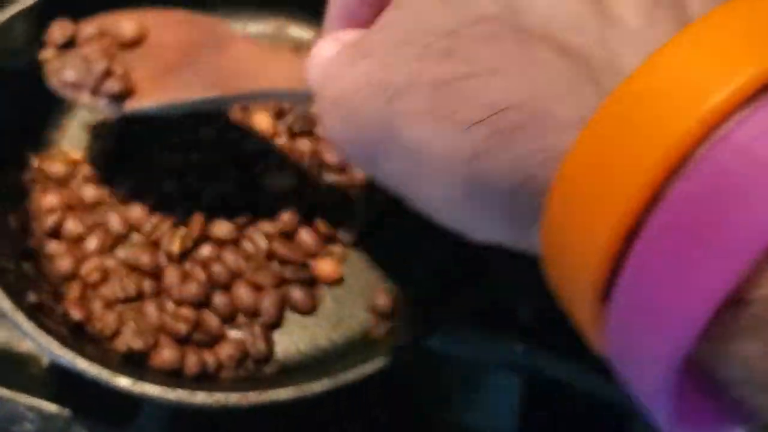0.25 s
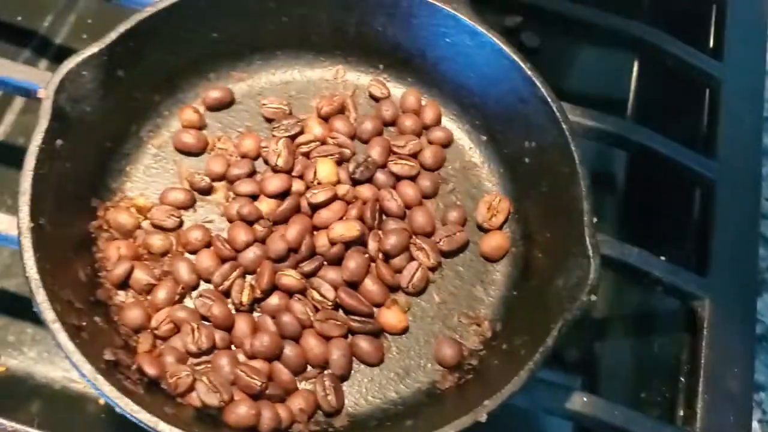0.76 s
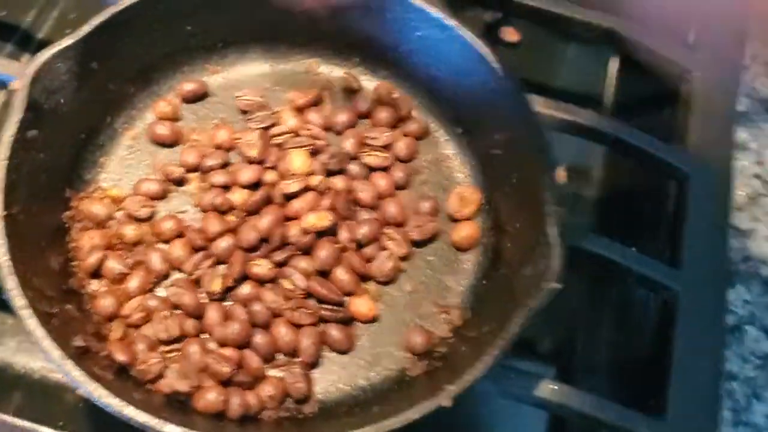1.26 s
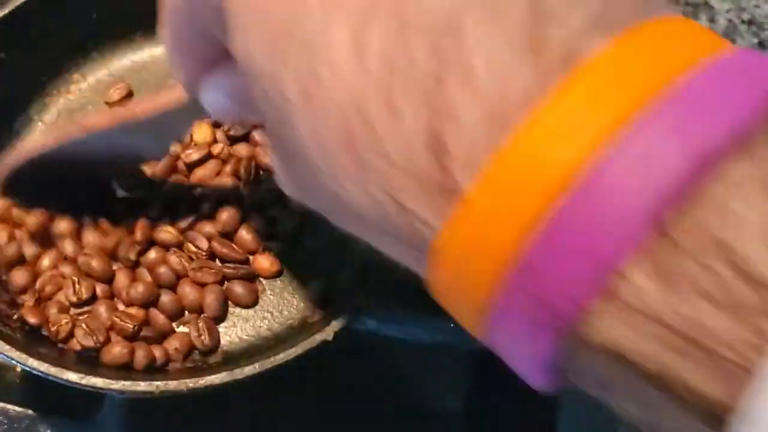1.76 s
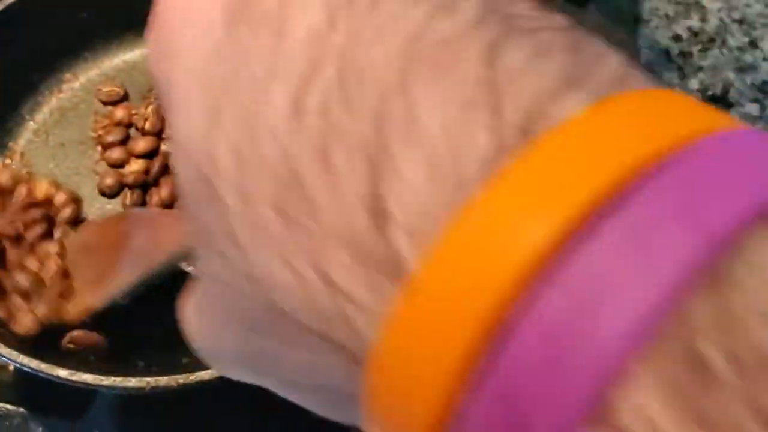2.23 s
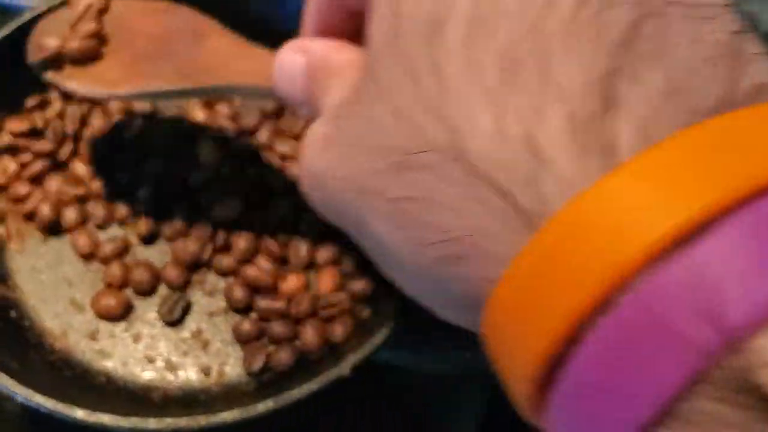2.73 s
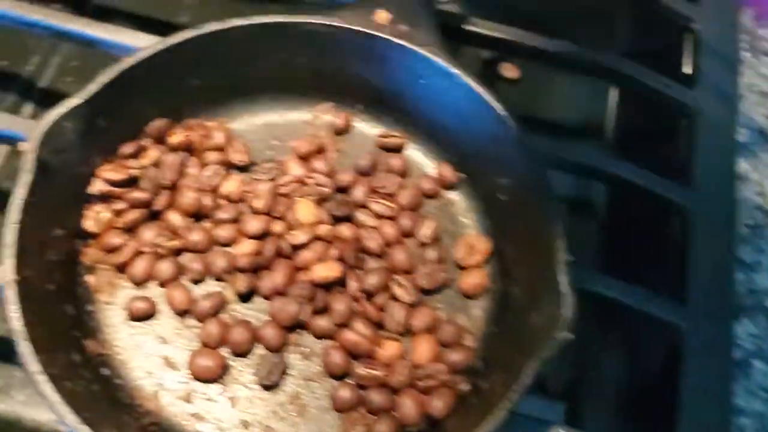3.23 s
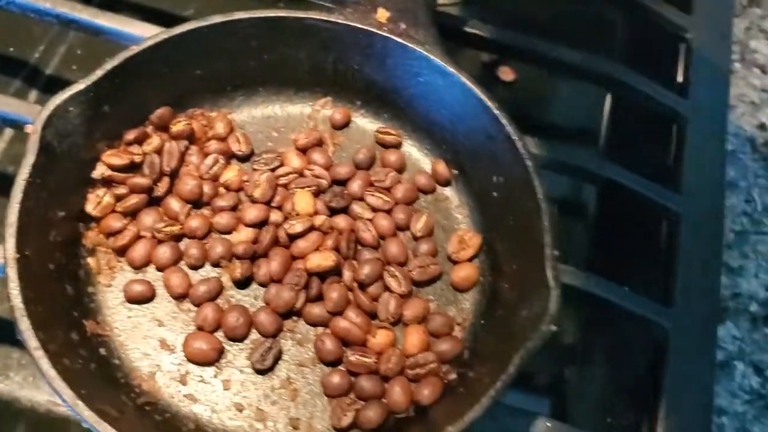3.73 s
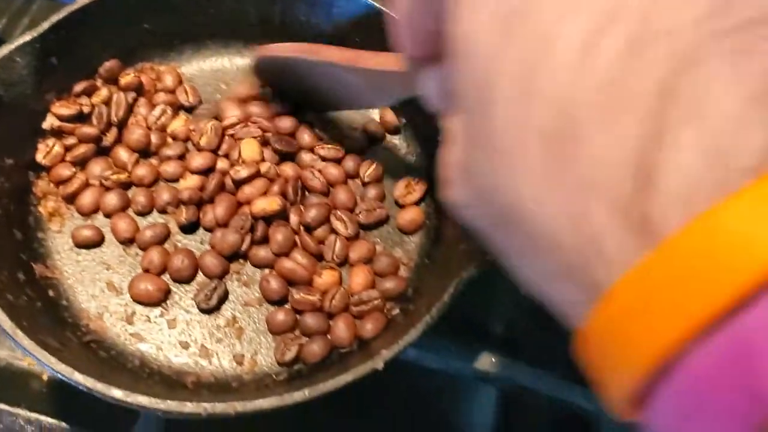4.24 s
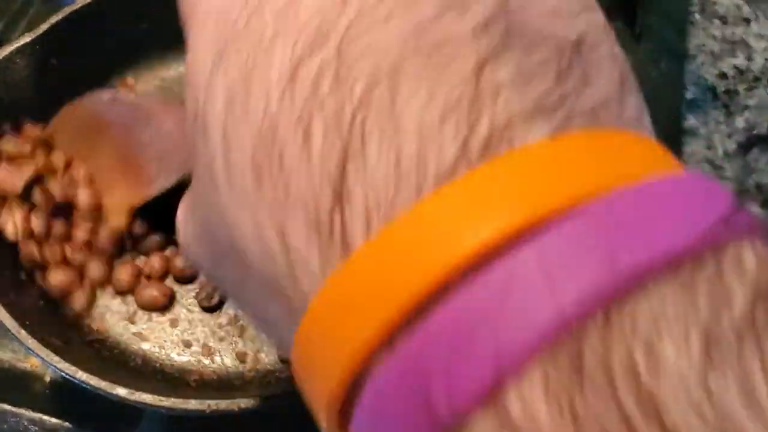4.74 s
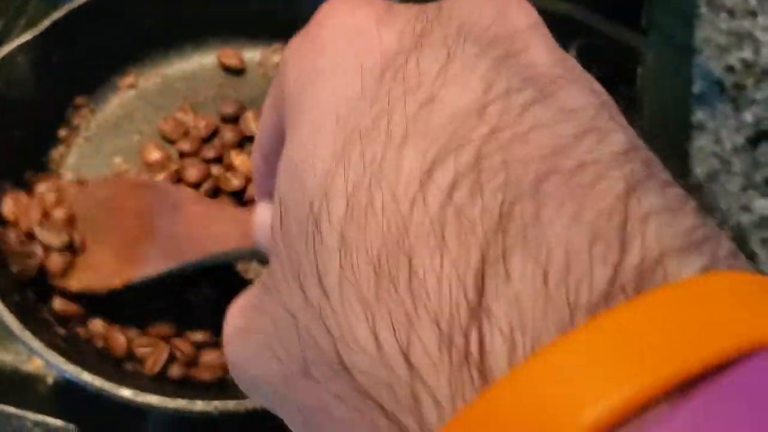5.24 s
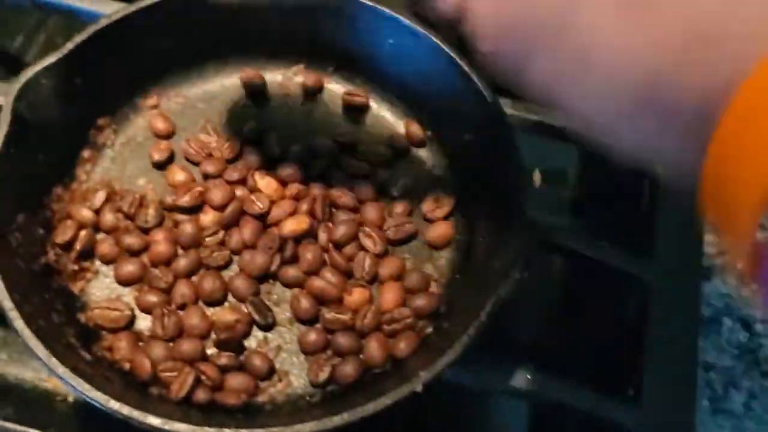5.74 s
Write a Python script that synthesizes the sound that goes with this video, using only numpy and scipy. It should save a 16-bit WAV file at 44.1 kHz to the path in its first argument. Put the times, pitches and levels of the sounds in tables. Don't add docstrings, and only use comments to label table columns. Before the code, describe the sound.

Close kitchen sound of hard beans being pushed and tipped in a ringing iron pan by a wooden blade, loose stove metal chattering twice.

```python
import sys
import numpy as np
from scipy import signal
from scipy.io import wavfile
from scipy.ndimage import uniform_filter1d

SR = 44100
rng = np.random.default_rng(int(sys.argv[2]) if len(sys.argv) > 2 else 0)


def materialize(psi):
    bounded = np.clip(np.atleast_2d(psi).T, -1, 1)
    quanta = np.round(bounded * 32767).astype(np.int16)
    wavfile.write(sys.argv[1], SR, quanta)


def voltage_ratio(decibels):
    exponent = np.asarray(decibels, float) / 20
    return 10 ** exponent


N = 263718

# frequency in Hz, density in dB per Hz.
RUMBLE_SPECTRUM = [(12, -53), (20, -41.5), (53, -2), (92, -9), (125, -3), (146, -23.5), (240, -9.5),
                   (333, -11), (389, -6.5), (629, -12), (707, -18), (793, -16.5), (2000, -49),
                   (2600, -78.5), (4400, -120)]
# frequency in Hz, left-right likeness from 0 to 1.
RUMBLE_LIKENESS = [(60, 0.79), (240, .93), (950, 0), (3770, 0)]
HUM_LEVELS = [-66, -66, -76, -68]
# frequency in Hz, density in dB per Hz.
HISS_SPECTRUM = [(710, -24.5), (1200, -21), (1990, -7), (2370, -5.5), (7250, -7.5), (8300, -2.5),
                 (15100, -1.5), (16000, 4), (16500, -30.5)]
# start in seconds, end in seconds.
PAUSES = [
    (0.468, .97),
    (3.13, 3.497),
    (5.7, 5.83),
]
# frequency in Hz, t60 in seconds.
ROOM_DECAY = [(300, 0.28), (2000, 0.16), (8000, 0.22), (16000, 0.16)]

# start in seconds, ring in dB, clatter in dB, ring fall in dB/s, clatter fall in dB/s.
SHAKES = [
    (.985, -27, -25, 79.5, 270),
    (1.072, -31, -19.5, 189.5, 332),
    (1.362, -81, -86, 14.5, 11),
    (3.498, -37.5, -37.5, 2, 64),
    (3.626, -40, -49.5, 129, 199.5),
    (4.031, -70.5, -90.5, 258.5, 20.5),
]
# time in seconds, ring in dB, clatter in dB, t60 in seconds.
JOLTS = [(0.9845, -22, -13.5, 0.076), (0.993, -19, -9.5, 0.052), (1.008, -24.5, -15.5, 0.098),
         (1.0225, -26.5, -15, 0.055), (1.0676, -36, -13, 0.048), (1.0738, -41, -17, 0.06),
         (1.088, -52, -14.5, .08), (1.108, -38, -22.5, 0.077), (1.3596, -48.5, -68, 0.013),
         (1.3693, -50.5, -77, 0.21), (3.4992, -27.5, -16, 0.038), (3.5362, -23, -15.5, 0.12),
         (3.5532, -21.5, -8.5, 0.033), (3.628, -26, -28, 0.022), (3.638, -29, -28, 0.041),
         (3.6753, -39, -34, 0.043), (1.7025, -61, -16, .07), (1.7062, -60, -12, 0.064)]
# frequency in Hz, density in dB per Hz.
CLATTER_SPECTRUM = [(710, -70.5), (1200, -61), (1880, -26.5), (2850, -24.5), (3800, -6.5), (4780, -14.5),
                    (10100, -1), (11200, 0), (15300, -1), (16500, -26)]
PART_HZ = [1790, 1919, 3600, 3720, 3814, 3876, 3920, 5000, 5888, 6044, 6593, 7516, 8463, 9572, 10808, 11309,
           11641, 12680, 13894, 14741, 15418]
PART_DB = [-23.5, -4, -19, -13.5, 6.5, -1, -6, -12.5, -4.5, -2, -3.5, -3.5, 4, -15.5, -26.5, -11.5, -12.5,
           -16.5, -20.5, -7, -10.5]

# time in seconds, pitch in Hz, level in dB, t60 in seconds.
PINGS = [(0.094, 110, -37.5, 0.046), (.195, 7210, -41, 0.33), (.213, 8172, -43, 0.22),
         (.444, 7100, -58, 0.18), (.444, 3100, -58.5, 0.33), (.993, 3531, -38, .15), (.99, 8904, -37, .15),
         (1.022, 3815, -29.5, 0.11), (1.075, 11154, -32.5, 0.17), (1.088, 11639, -33, 0.17),
         (1.095, 6040, -41.5, 0.28), (1.5052, 12000, -35, 0.0071), (1.6925, 2900, -37, .02),
         (2.005, 6998, -39, .25), (2.136, 14000, -30, 0.016), (2.31, 9790, -38, 0.17),
         (2.604, 6406, -50, .3), (2.686, 5340, -44.5, 0.57), (2.795, 6406, -42, 0.57),
         (2.794, 6966, -48, 0.34), (2.795, 7795, -49, .3), (3.499, 6700, -40.5, .08),
         (3.536, 1927, -35, 0.18), (3.537, 6643, -28, .12), (3.54, 6761, -36.5, .12),
         (3.537, 7526, -39, .12), (3.553, 11886, -35.5, .1), (3.553, 4996, -43, 0.24),
         (3.6, 1927, -48, 0.44), (4.181, 1712, -36.5, 0.091), (4.409, 2713, -38, .04),
         (4.455, 4748, -53, .4), (4.7, 7267, -32, .3), (4.7, 7074, -41, 0.26), (4.7, 4770, -44, 0.4),
         (5.43, 5814, -56, .3), (5.46, 9076, -49, .2)]

IRON_HZ = [385, 472, 1533, 1655, 1710, 2512, 3165, 3101, 3903, 4729, 4765, 5160, 5340, 5813, 6365, 6405,
           6967, 7210, 7792, 8175, 8993, 9352, 9800, 10691, 11005, 11341, 11734, 12503, 12995, 13321]
# level in dB, t60 in seconds.
IRON_MODES = [(-18, 0.24), (-15.5, 0.099), (-11.5, 0.33), (-11.5, 0.18), (-11, 0.091), (-29.5, 0.5),
              (-6.5, 0.16), (-10.5, 0.29), (-10, 0.08), (-6.5, 0.084), (-13, 0.25), (-14.5, 0.17),
              (-12, 0.098), (-13, 0.23), (-19, 0.14), (-11, 0.13), (-8, 0.17), (-3.5, 0.073), (-14, 0.16),
              (-15.5, 0.34), (-10, 0.13), (-20.5, 0.15), (-11.5, 0.2), (-20, 0.082), (-22.5, 0.05),
              (-9, 0.063), (-19.5, 0.18), (-18, 0.12), (-20.5, 0.11), (-17, 0.18)]
FLOOR_HZ = 3010, 3175
# start in seconds, whole pan in dB, direct fizz in dB, floor pair in dB.
LOOSENESS = [
    (0, -1, -6, -6.5),
    (1.4, 1.5, 1, -2),
    (1.69, -9.5, -2.7, 6),
    (2.3, -1, 2.5, 4),
    (4.1, -0.7, -4.5, 1),
    (4.54, 0.7, -1.5, -11),
    (4.69, 1, -1, -12.5),
    (4.9, -2, -3, -4),
    (5.15, -2.9, -0.5, -3.5),
]
# time in seconds, rim mode in dB, floor pair in dB, wall mode in dB, lip mode in dB.
LONG_KNOCKS = [(0.1261, -66, -46, -60, -67), (0.1935, -58, -63, -72, -54), (1.4588, -32, -36, -54, -48),
               (1.5754, -43, -39, -45, -54), (1.702, -38.5, -37, -35, -37),
               (1.7914, -55.5, -48.5, -52, -47), (1.8692, -55, -54.5, -41.5, -52),
               (1.9335, -36, -41.5, -37, -48), (2.0164, -52.5, -44.5, -50.5, -45),
               (2.064, -34, -46.5, -57, -51.5), (2.3094, -61.5, -73, -65.5, -57),
               (2.3574, -55, -58.5, -63.5, -66), (2.456, -54, -41.5, -74, -62.5),
               (2.5184, -58, -51, -58.5, -62), (2.606, -43, -58, -51, -63),
               (2.6394, -53.5, -50.5, -48.5, -67), (2.685, -44.5, -40, -35, -57.5),
               (2.794, -44, -46.5, -54, -60), (2.8594, -46, -60, -73, -48), (2.919, -52, -46, -76, -45.5),
               (4.1787, -33, -24.5, -35, -47.5), (4.3001, -52, -47, -51.5, -53.5),
               (4.3294, -55, -40.5, -63, -56), (4.4079, -55.5, -43, -59, -57),
               (4.5576, -33, -44.5, -42.5, -50), (4.5984, -46.5, -41.5, -48.5, -58),
               (4.6274, -54.5, -47.5, -54, -49), (4.6994, -65, -43, -57, -42),
               (4.9124, -67, -64.5, -54, -74), (4.9724, -60.5, -62, -48, -67), (5.0294, -65, -72, -61, -62),
               (5.241, -56.5, -61, -75, -73), (5.3884, -57.5, -78, -71, -66), (5.4274, -61, -68, -71, -63),
               (5.459, -57.5, -56, -70, -48.5)]
# pitch in Hz, column of the knock table, level in dB, t60 in seconds.
LONG_MODES = [(2512, 1, -4.5, .85), (3090, 2, -3, .26), (3058, 2, -8, .2), (3903, 3, -2, .2),
              (4729, 4, -6, .12), (4765, 4, -2, .25)]

# time in seconds, bean motion in dB, blade pressure in dB.
PUSHES = [
    [(1.44, -80, -90), (1.458, -44, -40), (1.5, -51, -41), (1.618, -39.5, -32.5), (1.695, -55, -47)],
    [(1.696, -36, -42), (1.746, -32, -43.5), (1.96, -28.5, -44), (2.06, -32.5, -49), (2.184, -38.5, -38),
     (2.33, -46.5, -41), (2.45, -52.5, -58)],
    [(4.135, -74, -73.5), (4.18, -43, -44), (4.235, -46.5, -44.5), (4.32, -30, -41.5), (4.37, -52.5, -54.5),
     (4.54, -52, -53.5)],
    [(4.541, -46, -63.5), (4.558, -42, -44), (4.72, -39.5, -43.5), (4.87, -49, -53.5), (4.97, -48, -57.5),
     (5.07, -59, -66.5), (5.11, -54, -70), (5.2, -58, -75), (5.35, -74, -70)],
]
# time in seconds, bean motion in dB.
POURS = [
    [(0, -44.5), (.08, -51), (.212, -41.5), (.42, -67), (.452, -58.5), (.62, -85)],
    [(2.451, -54), (2.58, -46), (2.63, -40.5), (2.82, -44), (3.016, -54), (3.09, -95)],
    [(5.351, -56), (5.4, -47.5), (5.5, -50), (5.75, -104)],
]
# frequency in Hz, density in dB per Hz.
DRAG_SPECTRUM = [(24, -38), (40, -5), (113, -15.5), (200, -8.5), (409, -4.5), (480, -1), (649, -11.5),
                 (1210, -17), (1800, -26), (2340, -43), (3960, -120)]
# frequency in Hz, density in dB per Hz.
FIZZ_SPECTRUM = [(4000, -25), (6500, 0.5), (8000, -1.5), (12000, -4), (15500, -4), (16500, -28)]
# pitch in Hz, t60 in seconds, level in dB.
HOLLOW_MODES = [(1840, 0.0052, -6.5), (2500, 0.0063, -6), (3200, 0.016, -3.5), (3960, 0.0055, 1.5),
                (5340, 0.0074, -2)]
# time in seconds, thud in dB, snap in dB, left-right in dB.
BLOWS = [(0.158, -45, -34.5, -9), (0.195, -54, -30.5, -3), (1.446, -34, -27, -1), (1.4601, -5, -26, 0),
         (1.7016, 0, -16, -1), (1.7527, -6, -23.5, 2), (1.868, -12.5, -25.5, -10), (1.9436, -7.5, -25.5, 7),
         (4.145, -52, -31.5, -12), (4.1785, -1.5, -51, 1.5), (4.2896, -13.5, -24, -2), (4.561, -12, -48, 4),
         (4.6998, -26, -35, -2), (5.196, -55, -46.5, -3), (5.227, -62.5, -42, -1)]
# time in seconds, thud in dB, snap in dB, left-right in dB.
DROPS = [(0.0269, -71, -44.5, -2), (.093, -37, -48, -5), (0.2126, -74, -35, -9), (0.4432, -58, -53, -8),
         (2.3097, -65, -34.5, 6), (2.358, -59, -36, 4), (2.46, -41, -42.5, 5), (2.604, -36, -32.5, 2),
         (2.6845, -65.5, -32.5, 4), (2.7948, -66, -28.5, 1), (4.4093, -28, -43, -1),
         (5.3882, -46, -47.5, 17), (5.427, -70, -38.5, -1)]
# time in seconds, level in dB, left-right in dB.
CLACKS = [(0.9562, -59, 16), (1.8722, -26.5, -6.5), (1.9363, -22, 4), (2.022, -24, 7), (2.028, -26, 0.5),
          (2.0672, -12, 4), (4.409, -35, 5.5), (4.5509, -30, 11), (4.555, -28, 1), (4.562, -22.5, 6),
          (4.574, -25, 0), (4.5772, -25, 9), (4.586, -33.5, 0), (4.601, -21, 2.5), (4.787, -40, 16.5)]
# time
# in seconds, level in dB, pitch in Hz, left-right in dB.
TICKS = [(0.128, -36, 4420, -3), (0.146, -34.5, 8800, 13), (0.2592, -40, 12600, 3),
         (1.4577, -25.5, 12200, -17), (1.559, -34.5, 1450, 2), (1.576, -20.5, 5560, -4),
         (1.5917, -29, 5700, 5), (1.618, -36, 5500, 3), (1.6168, -32.5, 2600, 1),
         (1.6355, -32.5, 2500, 3.5), (1.655, -31.5, 2860, 3), (1.8122, -31, 3400, -5),
         (1.858, -35, 11900, 0.5), (1.7928, -26.5, 9400, -11), (1.918, -30, 13900, -18),
         (1.9345, -25, 8400, -15), (1.948, -24.5, 8900, -1.5), (2.0174, -22, 6240, 15),
         (2.0275, -24, 6000, -7), (2.067, -22.5, 6350, 10.5), (2.5199, -38.5, 3800, 5),
         (2.59, -47, 8200, 0), (2.666, -40, 9200, 0), (2.72, -39, 9000, 0), (2.6067, -37, 3750, -4),
         (.9935, -20, 11600, -6), (1.0755, -16, 11450, 3), (3.538, -19, 6940, 12), (3.553, -14, 11900, -8),
         (1.4602, -24, 1570, 4), (4.1809, -25, 1600, 4.5), (4.1795, -25, 3800, 3.5),
         (2.1304, -32.5, 3100, 4.5), (2.16, -44, 1970, 3), (4.163, -30.5, 12760, -7.5),
         (4.2903, -24, 5400, -6), (4.411, -39, 6700, 25), (4.562, -37.5, 7400, 28), (4.628, -29, 5360, 8.5),
         (4.631, -27, 2540, 2), (4.915, -43.5, 3570, 9), (4.9624, -40.5, 3780, 12), (4.974, -39.5, 3810, 6),
         (5.03, -43.5, 3860, 14), (2.007, -26, 11500, 0), (5.32, -58, 3500, 7), (5.39, -38, 4300, 3),
         (5.3895, -38, 6250, -4), (5.5135, -43.5, 9150, 15)]


def evened(x):
    return x / np.sqrt(np.mean(x ** 2) + 1e-20)


def read(points, hz):
    f, value = np.transpose(points)
    return np.interp(np.log(hz + 1), np.log(f + 1), value)


def curves(tables):
    t, out = np.arange(N) / SR, np.full((len(tables[0][0]) - 1, N), -120.)
    for rows in tables:
        s, *columns = np.transpose(rows)
        on = (t >= s[0]) & (t <= s[-1])
        out[:, on] = [np.interp(t[on], s, c) for c in columns]
    return out


def coloured(x, points):
    gain_db = np.maximum(read(points, abs(np.fft.fftfreq(8192, 1 / SR))), -90)
    response = np.exp(np.conj(signal.hilbert(np.log(voltage_ratio(gain_db)))))
    taps = np.fft.ifft(response).real[:4096]
    return signal.oaconvolve(x, (taps / np.linalg.norm(taps))[None], axes=1)[:, :N]


def band(x, lo_hz, hi_hz):
    return signal.sosfilt(signal.butter(2, [lo_hz, hi_hz], "band", fs=SR, output="sos"), x)


def grains(per_s, spread_db):
    draw, size, sign = rng.random(N), rng.exponential(1, N), rng.standard_normal(N)
    return evened((draw < per_s / SR) * sign * voltage_ratio(spread_db * np.minimum(size, 4)))


def wander(count):
    return evened(uniform_filter1d(uniform_filter1d(rng.standard_normal(N), count), count))


def placed(x, pan_db, lag=3):
    return np.array([x * voltage_ratio(pan_db / 2), np.roll(x, lag) * voltage_ratio(-pan_db / 2)])


def ringing(drive, pitches, modes, spot_db, turn):
    db, t60 = np.transpose(modes)
    t = np.arange(9000) / SR
    swing = np.exp(np.outer(2j * np.pi * np.array(pitches) - np.log(1000) / t60, t))
    swing *= np.cos(np.pi / 2 * (t / t[-1]) ** 2)
    out = 0
    for spot in drive:
        size = voltage_ratio(db + spot_db * rng.standard_normal(len(db)))
        lead = np.exp(1j * turn * rng.standard_normal(len(db)))
        ring = (np.array([size, size * lead]) @ swing).imag
        out = out + signal.fftconvolve(spot, ring / 30, axes=1)[:, :N]
    return out


def bursts(rows, count, tail=1):
    low, high = np.zeros((2, count, 2, N))
    t = np.arange(4000) / SR
    for k, (s, low_db, high_db, t60, pan_db) in enumerate(rows):
        a, b = tail * rng.standard_normal((2, 2, len(t))) * voltage_ratio(-60 * t / max(t60, .003))
        a[1] = .9 * a[0] + .44 * a[1]
        b[1] = .7 * b[0] + .7 * b[1]
        a[:, 0] += 3.
        b[:, 0] += 3.
        at, side = round(s * SR), voltage_ratio([[pan_db / 2], [-pan_db / 2]])
        low[k % count, :, at:at + len(t)] += voltage_ratio(low_db) * side * a
        high[k % count, :, at:at + len(t)] += voltage_ratio(high_db) * side * b
    return low, high


def rumble():
    frames, hz = N // 512 + 5, np.fft.rfftfreq(2048, 1 / SR)
    a, b, c, d, patches = rng.standard_normal((frames, 1025, 5)).T
    patches = evened(uniform_filter1d(uniform_filter1d(patches, 10, 0), 6, 1))
    same = np.clip(read(RUMBLE_LIKENESS, hz), -1, 1)[:, None]
    left = a + 1j * b
    right = same * left + np.sqrt(1 - same ** 2) * (c + 1j * d)
    swell_db = 2.5 * np.outer(200 / (hz + 200), wander(count=3000)[:frames * 500:500])
    z = np.array([left, right]) * voltage_ratio(read(RUMBLE_SPECTRUM, hz)[:, None] + 1.9 * patches + swell_db)
    noise = signal.istft(z, nperseg=2048, noverlap=1536)[1][:, :N]
    return voltage_ratio(-57.5) * evened(noise) * voltage_ratio([[.6], [-.6]])


def hum():
    t, mains_hz, out = np.arange(N) / SR, 60, 0
    for k, db in enumerate(HUM_LEVELS):
        size = np.sqrt(2) * voltage_ratio(db + 3.4 * wander(count=2500))
        out = out + size * np.sin(2 * np.pi * ((k + 1) * mains_hz * t + rng.random()))
    return out


def hiss_db():
    t = np.arange(N) / SR
    rest_db, creep, sink = -86.5, 46, 33
    ups = [np.minimum(creep * (t - a), creep * (b - a) - sink * (t - b)) for a, b in PAUSES]
    return rest_db + np.maximum(np.max(ups, axis=0), 0)


def kitchen():
    hiss = coloured(rng.standard_normal((2, N)), HISS_SPECTRUM) * voltage_ratio(hiss_db() + 8.5)
    return rumble() + hum() + hiss


def room(x):
    taps = np.zeros((2, SR // 2))
    slots = np.arange(120, SR // 2 - 20, 20)
    at = slots + rng.integers(0, 20, (2, len(slots)))
    np.put_along_axis(taps, at, rng.choice([-1., 1.], at.shape), 1)
    hz, t, z = signal.stft(taps, SR, nperseg=256)
    tail = signal.istft(z * voltage_ratio(-60 * t / read(ROOM_DECAY, hz)[:, None]), SR, nperseg=256)[1]
    return signal.fftconvolve(x, tail / np.linalg.norm(tail[0]), axes=1)[:, :N]


def shaking():
    t, rows = np.arange(N) / SR, np.array(SHAKES)
    rise_s, longest_s = .008, .4
    row = np.maximum(np.searchsorted(rows[:, 0], t) - 1, 0)
    s, ring_db, clatter_db, ring_fall, clatter_fall = rows[row].T
    age = abs(t - s)
    on = (t > s) & (age < longest_s)
    rise_db = np.where(on, 20 * np.log10(np.clip(age / rise_s, 1e-6, 1)), -120)
    return ring_db - ring_fall * age + rise_db, clatter_db - clatter_fall * age + rise_db


def loose_part():
    rows = np.insert(JOLTS, 4, -2.5, axis=1)
    low, high = bursts(rows, count=2)
    high[:, 1] = np.roll(high[:, 1], 1, axis=1)
    ring_db, clatter_db = shaking()
    chatter = [placed(grains(1856, 4.7) * voltage_ratio(ring_db - 12.0), -5.2) for _ in low]
    clatter = placed(grains(2500, 1.7), -2.5) + 0.66 * rng.standard_normal((2, N))
    clatter = clatter * voltage_ratio(clatter_db - 6.0 + 2.3 * wander(count=200))
    clatter = coloured(clatter + voltage_ratio(-9.0) * high.sum(0), CLATTER_SPECTRUM)
    detune = 0.009 * rng.standard_normal((3, len(PART_HZ))) * np.arange(3)[:, None]
    hz = np.outer([1, 1, 1], PART_HZ) * (1 + detune)
    db = np.array(PART_DB) + [[-1.5], [-2.5], [-2.5]]
    t60 = .072 * (4000 / hz.ravel()) ** 0.42
    modes = np.transpose([db.ravel(), t60])
    ring = ringing(voltage_ratio(-10.0) * low + chatter, hz.ravel(), modes, 1.0, 2.1)
    return clatter + band(ring, 1450, 19000)


def pings():
    out, t = np.zeros(N), np.arange(16000) / SR
    for s, hz, db, t60 in PINGS:
        throb = 1 + .5 * np.sin(2 * np.pi * 41 * t + hz)
        size = voltage_ratio(db - 60 * t / t60) * throb * np.minimum(t / .0006, 1)
        part = out[round(s * SR):][:len(t)]
        part += (size * np.sin(2 * np.pi * hz * t))[:len(part)]
    return placed(out, 0.88)


def blade_song():
    start_s, hold_s, hz, width_hz, level_db = 4.585, .14, 705, 45, -56
    t = np.arange(N) / SR - start_s
    tone = evened(band(rng.standard_normal(N), hz - width_hz / 2, hz + width_hz / 2))
    fade = np.clip(np.minimum(t, hold_s - t) / 0.005, 0, 1)
    return placed(tone * voltage_ratio(level_db) * fade, 2.8)


def long_rings():
    rows, t, out = np.transpose(LONG_KNOCKS), np.arange(N) / SR, 0
    for hz, column, db, t60 in LONG_MODES:
        kicks = np.zeros(N)
        kicks[np.round(rows[0] * SR).astype(int)] = voltage_ratio(2 * (rows[column] + db))
        energy = signal.lfilter([1], [1, -voltage_ratio(-120 / (t60 * SR))], kicks)
        drift = wander(count=700)
        size = uniform_filter1d(np.sqrt(energy), size=90) * voltage_ratio(1.1 * drift)
        out = out + size * np.sin(2 * np.pi * hz * t + 0.64 * drift[::-1])
    return placed(out, 3.5)


def stroke():
    rows = np.array(LOOSENESS)
    return rows[np.maximum(np.searchsorted(rows[:, 0], np.arange(N) / SR) - 1, 0)].T


def loosened(drive):
    s, whole_db, fizz_db, floor_db = stroke()
    x = drive * voltage_ratio(whole_db)
    return x + band(x * (voltage_ratio(floor_db) - 1), *FLOOR_HZ)


def knocks():
    rows = [(s, a, b, 0.056, c, -5.5) for s, a, b, c in BLOWS]
    rows += [(s, a, b, 0.14, c, 4) for s, a, b, c in DROPS]
    return np.array(sorted(rows))


def aftermath(strength_db, fall):
    s = knocks()[:, 0]
    t, kick = np.arange(N) / SR, np.full(N, -200.)
    kick[np.round(s * SR).astype(int)] = strength_db
    return np.maximum.accumulate(kick + fall * t) - fall * t


def stirring():
    motion, pressure = curves(PUSHES)
    poured = curves(POURS)[0]
    bounce = aftermath(knocks()[:, 2] - 10.5, fall=255)
    jar = aftermath(knocks()[:, 1] - 48, fall=198)
    bare = poured > motion
    motion = np.where(bare, motion, np.maximum(motion, bounce))
    poured = np.where(bare, np.maximum(poured, bounce), poured)
    m, p = motion + 47, pressure + 47
    crunch_db = np.maximum(-50 + 0.83 * m + 0.27 * p, poured - 17)
    ring_db = np.maximum(-48.5 + 0.57 * m + 0.17 * p, poured - 5.5)
    drag_db = np.max([pressure, poured - 18.5, jar], axis=0)
    fizz_db = np.maximum(motion, poured - 3.5)
    free_db = np.where(bare, -1.5, -11)
    return fizz_db, crunch_db, drag_db, ring_db, free_db


def clicks(count):
    out, t = np.zeros((count, 2, N)), np.arange(600) / SR
    pitch = 3350 * (1 + .06 * rng.standard_normal(len(CLACKS)))
    clacks = [(s, db, hz, pan_db) for (s, db, pan_db), hz in zip(CLACKS, pitch)]
    for k, (s, db, hz, pan_db) in enumerate(clacks + list(TICKS)):
        rough = 1 + 0.14 * rng.standard_normal(len(t))
        t60 = 8.8 / hz + 0.0011
        swing = voltage_ratio(db + 10.0 - 60 * t / t60) * np.sin(2 * np.pi * hz * t) * rough
        at = round((s - .0004) * SR)
        out[k % count, :, at:at + len(t)] += placed(swing * np.minimum(t * hz / 0.57, 1), pan_db)
    return out


def crunch():
    t, out, clumps = np.arange(500) / SR, 0, voltage_ratio(3.2 * wander(count=350))
    for hz, t60, db in HOLLOW_MODES:
        knock = voltage_ratio(db - 60 * t / t60) * np.sin(2 * np.pi * hz * t)
        out = out + signal.oaconvolve(grains(1800, 2.8) * clumps, knock)[:N]
    return evened(out)


def strikes():
    hits = knocks()
    thud, snap = bursts(hits[:, :5] * [1, 0.87, 1, 0.61, 0.97], count=1)
    direct = voltage_ratio(-18.5) * band(thud[0], 1200, 5400) + voltage_ratio(-4.5) * band(snap[0], 5800, 13270)
    into_iron = hits[:, :5] + hits[:, 5:] * [0, 1, 1, 0, 0]
    thud, snap = bursts(into_iron * [1, 1, 1, .3, 1], count=3, tail=.12)
    force = voltage_ratio(5.5) * band(band(thud, 310, 2700), 280, 4000) + voltage_ratio(7.5) * band(snap, 3200, 16000)
    return direct, force


def pan():
    direct, blows = strikes()
    beans = band(clicks(count=3), 1150, 16500)
    fizz_db, crunch_db, drag_db, ring_db, free_db = stirring()
    rolling = [placed(grains(830, 3.5) * voltage_ratio(ring_db - 6.5), 4.5) for _ in blows]
    fizz = placed(grains(1500, 1.4), 0.34) + 1.02 * np.array([grains(3400, 2.4), grains(3000, 2.8)])
    fizz = coloured(fizz * voltage_ratio(fizz_db - 10.0 + 2.3 * wander(count=300)), FIZZ_SPECTRUM)
    drag = placed(grains(1500, 1.4), 2.0) + 0.24 * rng.standard_normal((2, N))
    drag = coloured(drag, DRAG_SPECTRUM) * voltage_ratio(drag_db - 7.5)
    fizz_spots = np.array([fizz, fizz[::-1], np.roll(fizz, 99, 1)])
    drive = blows + band(rolling, 300, 6700) + voltage_ratio(-24) * beans + voltage_ratio(free_db) * fizz_spots
    iron = ringing(loosened(drive), IRON_HZ, IRON_MODES, 3.0, 0.93)
    hollow = placed(crunch() * voltage_ratio(crunch_db - 3.5), 2.4)
    airborne = direct + beans.sum(0) + fizz * voltage_ratio(stroke()[2]) + hollow + drag
    return airborne + iron + long_rings() + blade_song()


def scene():
    near = pan() + loose_part() + pings()
    return near + voltage_ratio(-8.5) * room(near) + kitchen()


def band_limit(x):
    return signal.sosfilt(signal.butter(12, 17000, fs=SR, output="sos"), x)


def record(dry):
    edge = signal.firwin(255, 15900, window=("kaiser", 4), fs=SR)
    mix = signal.oaconvolve(dry, edge[None], "same")
    return band_limit(mix)


dry = scene()
out = record(dry)
materialize(out)
```